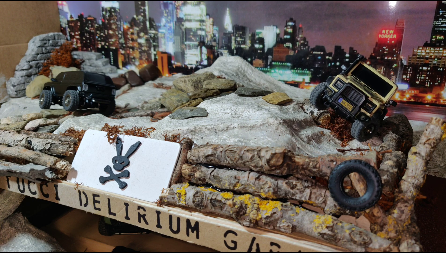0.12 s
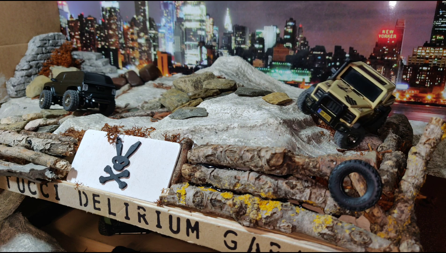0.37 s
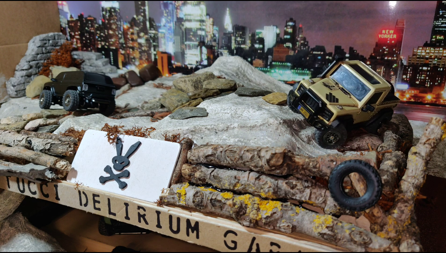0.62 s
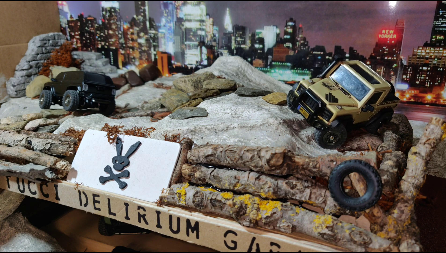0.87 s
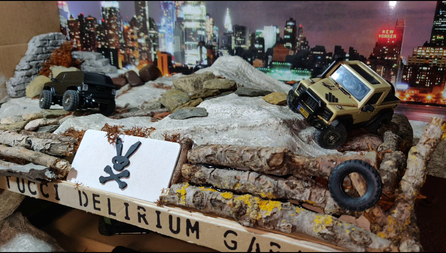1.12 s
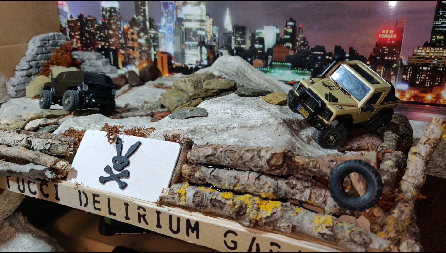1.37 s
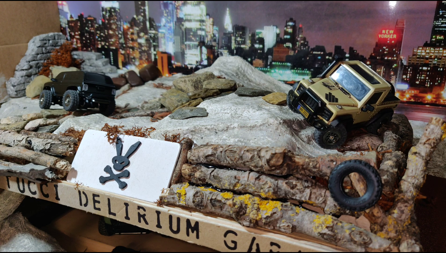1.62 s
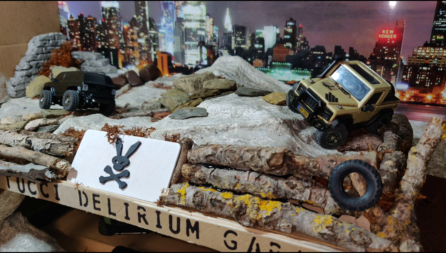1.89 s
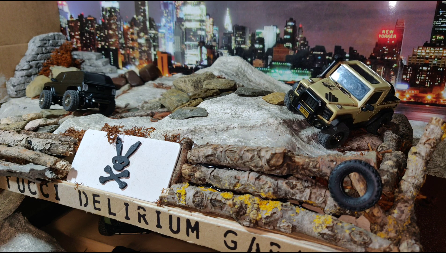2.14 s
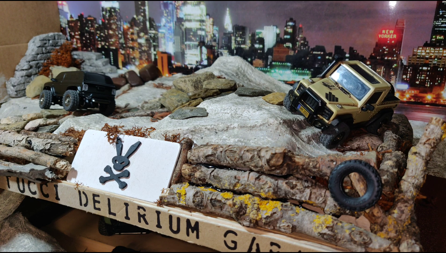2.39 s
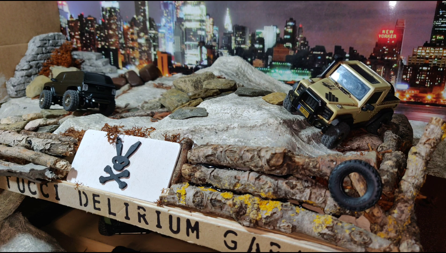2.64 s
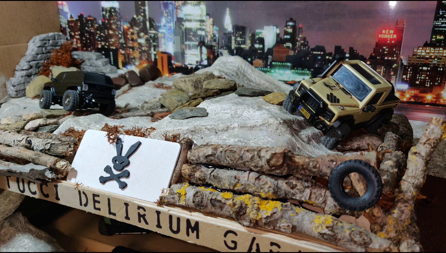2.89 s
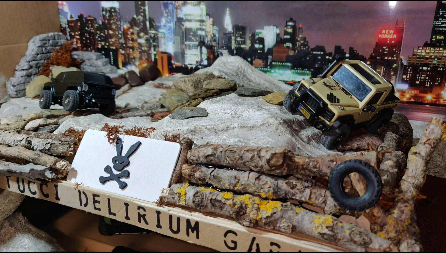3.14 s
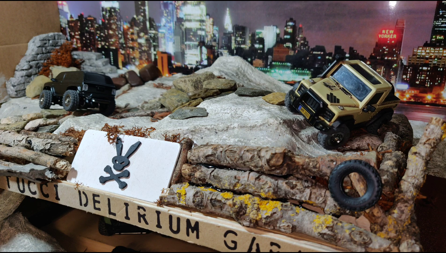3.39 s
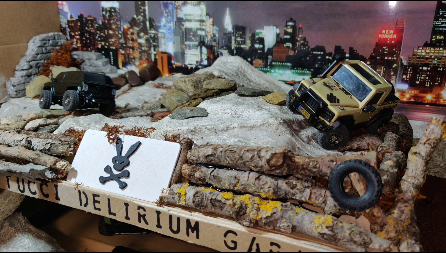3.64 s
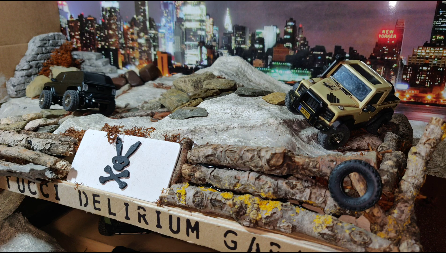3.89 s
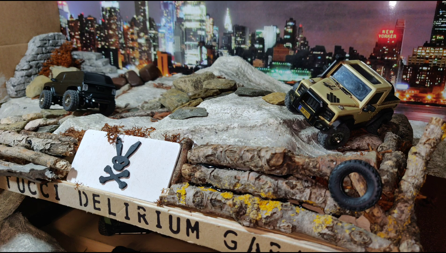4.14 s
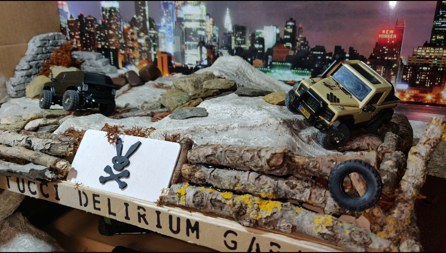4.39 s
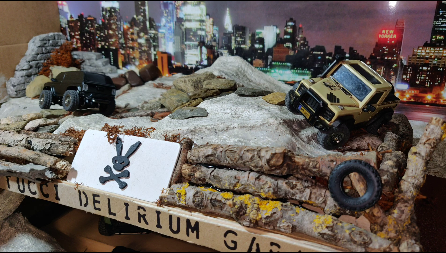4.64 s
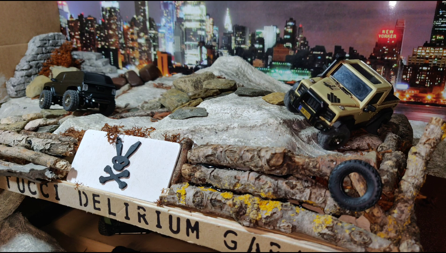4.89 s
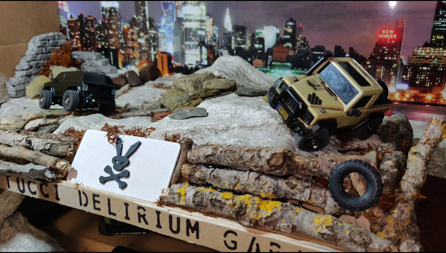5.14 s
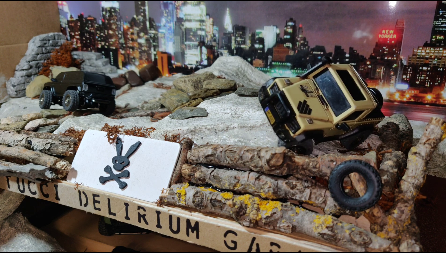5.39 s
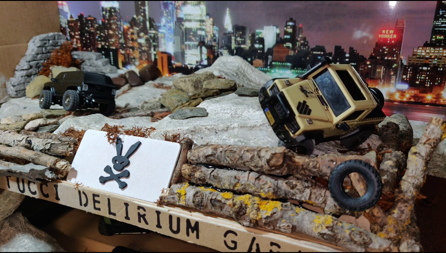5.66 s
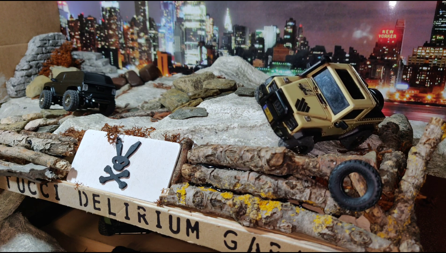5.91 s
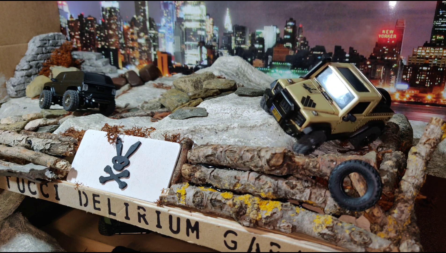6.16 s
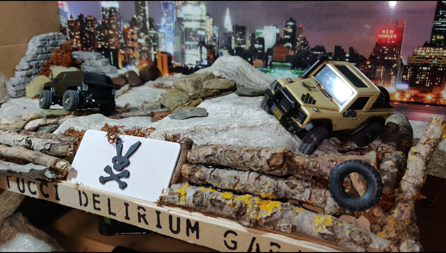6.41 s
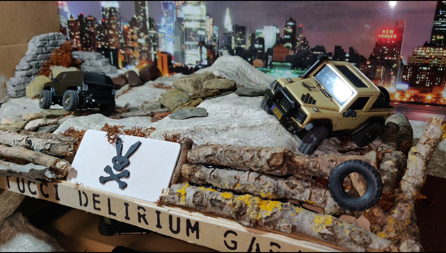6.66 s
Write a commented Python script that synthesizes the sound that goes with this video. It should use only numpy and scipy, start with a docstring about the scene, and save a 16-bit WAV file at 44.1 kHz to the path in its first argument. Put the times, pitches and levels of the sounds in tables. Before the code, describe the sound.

Close up in a quiet room, a tiny electric toy vehicle climbs rocks on a hollow board. A bright rattling gear whir rises and falls in under a second, then come sparse, tiny motor nudges and a few light knocks. Near five seconds a stronger, higher whir brings sharp plastic clacks and tyre scuffs, followed by small twitches and one last brief burst with clustered clicks. Faint hiss and low rumble remain underneath.

```python
"""Toy crawler on a hollow rock course

A tiny toy climbs rocks on a table-top board close to a phone with two unlike microphone ports. Meshing teeth
give a whine that glides with pinion speed and a noise rattle, both coloured by resonances of a plastic case.
Impulses ring the chassis and boom the board, shaped noise makes the tyre scuffs and a last soft breath-like
rustle, wavering sines make faint hums, and noise shaped over frequency makes the hush and rumble of a quiet
room."""
import sys
import numpy as np
from scipy import signal
from scipy.fft import rfft, irfft, next_fast_len
from scipy.io import wavfile
from scipy.ndimage import uniform_filter1d

SR = 44100
rng = np.random.default_rng(int(sys.argv[2]) if len(sys.argv) > 2 else 0)


def transcribe(signal):
    """Save signal, clipped to [-1, 1], as a 16-bit WAV file at the path in sys.argv[1]."""
    frames = np.atleast_2d(signal).T
    limited = np.clip(frames, -1, 1)
    pcm = np.round(limited * 32767).astype(np.int16)
    wavfile.write(sys.argv[1], SR, pcm)


def gain_from_db(level_db):
    """Turn a decibel level (scalar or array-like) into a linear amplitude factor."""
    decades = np.asarray(level_db, float) / 20
    return 10 ** decades


N = 298998  # length in samples

# Levels of sources are relative: the case, the echoes and the ports still alter them.
# Three climbs under full throttle: (time [s], tooth rate of the pinion [Hz], gear rattle level [dB])
CLIMBS = [
    [(.2, 595, -85), (.266, 802, -50), (.335, 1360, -39), (.382, 1953, -35), (.414, 1591, -36.5),
     (.463, 2284, -35), (.495, 2440, -32.5), (.515, 2348, -37.5), (.533, 2640, -34), (.553, 2620, -33),
     (.58, 2200, -34), (.605, 2053, -36), (.65, 2271, -33.5), (.687, 2126, -32), (.705, 2010, -31.5),
     (.72, 1814, -38), (.774, 1340, -34.5), (.815, 1000, -44), (.85, 698, -66), (.92, 510, -69)],
    [(4.8, 600, -96), (4.862, 1099, -47.5), (4.93, 1852, -35), (4.96, 1921, -30.5), (4.985, 1800, -35),
     (5.028, 2297, -30.5), (5.054, 2916, -27), (5.08, 3116, -29.5), (5.115, 3240, -28), (5.15, 3090, -32.5),
     (5.207, 2143, -33), (5.239, 1630, -36.5), (5.265, 1460, -34.5), (5.35, 1802, -38.5), (5.4, 2265, -40),
     (5.435, 2474, -34.5), (5.47, 2375, -34), (5.503, 1900, -33), (5.538, 1387, -47.5), (5.6, 700, -58)],
    [(6.01, 621, -73), (6.052, 1005, -47.5), (6.12, 2638, -42.5), (6.145, 3008, -39.5), (6.175, 2842, -25),
     (6.206, 2237, -29.5), (6.225, 2396, -32), (6.257, 2132, -31.5), (6.3, 2000, -32), (6.39, 1390, -34.5),
     (6.5, 603, -63)],
]
# Short nudges at creeping speed: (start of full level [s], hold [s], gear rattle level [dB])
NUDGES = [(1.244, 0.084, -44), (1.76, 0.014, -61.5), (1.955, .005, -55.5), (2.005, 0.01, -53.5),
          (2.2, 0.013, -59.5), (2.318, .001, -67), (2.42, 0.12, -49), (2.82, .05, -45.5), (2.89, .1, -40),
          (3.03, .03, -47.5), (3.19, 0.0022, -50.5), (3.256, .003, -54.5), (3.3, .005, -61.5),
          (3.346, 0.0033, -57.5), (3.52, 0.012, -59), (3.702, 0.021, -49), (3.932, 0.0025, -53.5),
          (4.052, .01, -46.5), (5.61, 0.068, -48), (5.7, 0.069, -52.5), (5.8, 0.0022, -49),
          (5.865, 0.08, -59.5)]
NUDGE_RISE_DB_S, NUDGE_FALL_DB_S = 550, 374
CREEP_HZ = 452.2  # mean tooth rate outside the climbs
TEETH, WHEEL_TEETH = 11, 37  # pinion, and the wheel it drives
# First five multiples of the tooth rate: (relative level [dB])
WHINE_ORDERS_DB = [-3, 4.5, 5, -5, -16]
# Whine over rattle in each climb, before its fades: (level [dB])
CLIMB_WHINE_DB = [-6, -9, -10]
# the whine stands out of the rattle once the pinion is fast
WHINE_FULL_HZ, WHINE_DB_PER_KHZ, WHINE_DRIFT_DB = 1800, 29, 1.5
# under a light load it fades, as the climb's rattle drops below this level
WHINE_LOADED_DB, WHINE_DB_PER_DB = -40, 4
RADIATES_HZ = 2300
TOOTH_PUFF = 0.3  # depth of the rattle's puff at each tooth
OWN_RATTLE = 0.66  # power share of the rattle that each port hears from another face of the case
# Resonances of the gear case: (frequency [Hz], width [Hz], gain [dB])
CASE_MODES = [(2090, 170, 2.5), (2570, 340, 4), (4767, 243, 9.5), (6730, 270, 7), (7450, 140, 6),
              (9320, 470, 5)]
CAN_HZ, CAN_WIDTH_HZ = 5870, 190
HOLLOW_HZ, HOLLOW_WIDTH_HZ, HOLLOW_DB = 3450, 1100, -8
# Gains as the toy tilts: (time [s], motor can's note [dB], top treble [dB])
FACING = [(0.2, 12.5, -6), (.6, 17.5, 11), (1.3, 16.5, -22), (3.001, 16.5, 4), (5, 16, 5), (5.5, 18.5, 7),
          (6.1, 11.5, 1.5), (6.252, 6.5, 11), (6.5, 9, 9)]

# Chassis on rock and bark: (time [s], knock peak [dB], boom of the board [dB], sharp tick [dB])
KNOCKS = [(0.327, -37, -49, -46.5), (0.624, -70, -45, -56), (0.656, -46, -51, -48),
          (0.679, -40, -40.5, -42), (0.836, -50.5, -56, -51), (2.465, -49, -59.5, -70),
          (2.881, -44.5, -52, -47), (3.005, -41.5, -48, -55), (3.7, -58, -79, -72), (4.05, -55.5, -81, -61),
          (4.869, -51.5, -50, -48), (4.922, -33.5, -46.5, -68), (4.984, -46, -44, -56),
          (5.03, -35, -49, -54), (5.052, -30.5, -49, -59), (5.074, -38, -42, -63),
          (5.366, -19.5, -38.5, -40), (5.422, -29.5, -37, -54), (5.483, -39.5, -52, -60),
          (5.691, -43, -52.5, -62), (6.172, -62, -62, -65), (6.204, -31.5, -41.5, -51),
          (6.234, -42, -53, -36), (6.254, -35, -73, -51), (6.28, -36.5, -38, -45), (6.309, -38, -41, -47),
          (6.354, -35.5, -59, -38)]
SCATTER_DB = 2  # spread of each mode's level from knock to knock
# Modes of the chassis: (frequency [Hz], relative level [dB], decay by 60 dB [s])
CHASSIS_MODES = [(408, -16, 0.19), (787, 7, 0.012), (1016, 5, 0.007), (1423, 5.5, 0.011),
                 (1900, -8, 0.0047)]
# Modes of the hollow board: (frequency [Hz], relative level [dB], decay by 60 dB [s])
BOARD_MODES = [(60.84, -2.5, 0.79), (78.5, -5, 0.46), (100.3, 4, 0.38), (156, -5, 0.26), (310, 2.5, 0.042)]
# Weight shifting on the board keeps it humming: (start of full level [s], hold [s], level [dB])
STIRS = [(.68, .08, -60), (1.34, 0.023, -63), (4.85, 0.094, -76), (5.03, 0.14, -59), (6.38, 0.067, -55)]
STIR_REST_DB, STIR_RISE_DB_S, STIR_FALL_DB_S = -71.5, 73, 29

# Tyres and belly drag on the rocks; the last swell is a soft breath-like rustle: (start of full level [s], hold
# [s], level [dB])
SCUFFS = [(.356, 0.0084, -51.5), (.63, 0.08, -53), (1.79, .08, -70.5), (2.2, 0.045, -69), (2.318, .01, -65),
          (2.9, .12, -60.5), (4.84, 0.059, -65), (4.96, 0.0078, -53), (5.0, 0.077, -48.5),
          (5.38, 0.053, -45.5), (5.49, 0.021, -55), (5.8, 0.0056, -60.5), (5.87, 0.1, -61.5),
          (6.204, 0.0061, -42.5), (6.25, 0.061, -52), (6.36, .03, -55), (6.56, 0.12, -58.5)]
SCUFF_RISE_DB_S, SCUFF_FALL_DB_S = 341, 261
# Spectrum of a scuff: (frequency [Hz], relative level [dB])
SCUFF_COLOUR = [(80, -1.5), (250, 9), (400, 11.5), (1000, 0.5), (2500, -15.5), (5000, -31.5)]

# Faint wavering hums: (start of full level [s], hold [s], level [dB], mean pitch [Hz])
HUMS = [(1.783, 0.061, -66, 395), (2.194, 0.1, -72, 405), (4.55, 0.13, -59, 169), (4.846, 0.072, -59, 290),
        (6.553, 0.17, -61, 315), (6.563, 0.05, -69, 400), (6.59, 0.13, -77, 1860)]
HUM_RISE_DB_S, HUM_FALL_DB_S = 300, 150
HUM_WAVER = 0.06  # spread of pitch, as a share

# Room hush: (frequency [Hz], left density [dB/Hz], right density [dB/Hz], likeness of the ports [0-1]);
# below RUMBLE_HZ the densities give only the shape
HUSH = [(19, -75, -79, 1), (41, -59.5, -67, 0.8), (72.4, -84, -72.5, 1), (103.4, -77.5, -86, 0.84),
        (148, -89.5, -94, 0.19), (230, -94.5, -95.5, 0.13), (500, -96.5, -99, 0), (1040, -101, -102, 0),
        (2000, -104, -105, 0), (4000, -104, -104, 0), (5400, -100, -104, 0), (7560, -109, -104, 0),
        (9550, -114, -113, 0.06), (15500, -114, -113, 0.26)]
# Lowest hush: (time [s], rms level over both ports before its drift [dB])
RUMBLE = [(0, -53.5), (.2, -49.5), (1.6, -54.5), (2.4, -55), (2.9, -59.5), (4.2, -58.5), (5.5, -55.5),
          (6.78, -57.5)]
RUMBLE_HZ, RUMBLE_DRIFT_DB = 81.5, 0.5

# Response of each port towards the toy: (frequency [Hz], left gain [dB], right gain [dB])
PORTS = [(30.2, -7, -11), (1026, -2, -4.5), (3240, 11.5, 10.5), (3880, 16.5, -3.5), (4230, 18, 10.5),
         (4460, 14.5, 8.5), (6000, 17.5, -5), (6680, 18, 8), (7420, 10.5, 20), (8500, 6, 19.5),
         (8930, -18, 12.5), (10100, -24, -1.5), (13700, -6.5, 0.5), (15600, -21, -5)]
ECHO_T60_S, ECHO_DB = 0.05, -2  # close echoes; energy against the straight sound


def unit(x):
    """Normalisation to rms 1."""
    return x / np.sqrt(np.mean(x ** 2))


def walk(rate):
    """Low-passed noise: smooth chance that changes about rate times a second, spread 1."""
    k = max(int(SR / rate), 1)
    return unit(uniform_filter1d(uniform_filter1d(rng.standard_normal(N), k), k))


def play(tables, column, rest):
    """Piecewise-linear control: one column of a list of bursts over time, rest between them."""
    t = np.arange(N) / SR
    out = np.full(N, float(rest))
    for rows in map(np.array, tables):
        on = (t >= rows[0, 0]) & (t <= rows[-1, 0])
        out[on] = np.interp(t[on], rows[:, 0], rows[:, column])
    return uniform_filter1d(out, size=350)


def swells(rows, rise, fall):
    """Exponential envelopes: gain that rises and falls at set dB per second around a held level."""
    t = np.arange(N) / SR
    power = 0
    for s, hold, db in rows:
        before, after = np.clip(s - t, 0, None), np.clip(t - s - hold, 0, None)
        power = power + gain_from_db(db - rise * before - fall * after) ** 2
    return np.sqrt(power)


def over_hz(hz, value, size):
    """Interpolation on a log-frequency axis for an rfft of that size."""
    return np.interp(np.log(np.fft.rfftfreq(size, 1 / SR) + 1), np.log(hz), value)


def colour(x, hz, db):
    """Minimum-phase filter of that gain: the cepstrum of its log is folded to be causal."""
    cep = irfft(over_hz(hz, db, size=2048) * np.log(10) / 20)
    cep[1:1024] *= 2
    cep[1025:] = 0
    return signal.fftconvolve(x, irfft(np.exp(rfft(cep))))[:N]


def ring(x, hz, t60):
    """Damped mode: a unit impulse gives a decaying sine of peak about 1."""
    r = np.exp(-np.log(1000) / (t60 * SR))
    w = 2 * np.pi * hz / SR
    return signal.lfilter([0, np.sin(w)], [1, -2 * r * np.cos(w), r * r], x)


def resonance(x, hz, width):
    """Band-pass response of one resonance, gain 1 at its peak."""
    return signal.lfilter(*signal.iirpeak(hz, hz / width, SR), x)


def highpass(x, order, hz):
    """Butterworth high-pass filter."""
    return signal.sosfilt(signal.butter(order, hz, "high", fs=SR, output="sos"), x)


def gear_whine(turn):
    """Harmonic excitation: multiples of the tooth rate, each wavering in level."""
    whine = 0
    for k, db in enumerate(WHINE_ORDERS_DB, start=1):
        whine = whine + gain_from_db(db + 2.5 * walk(110)) * np.sin(k * turn)
    # so small a case sends out little of a low whine
    return unit(highpass(whine, 3, RADIATES_HZ))


def gear_rattle(turn):
    """Amplitude-modulated noise: a rattle that puffs at each tooth, partly shared by the two ports."""
    both, *own = rng.standard_normal((3, N))
    noise = np.sqrt(1 - OWN_RATTLE) * both + np.sqrt(OWN_RATTLE) * np.array(own)
    return unit(noise * (1 + TOOTH_PUFF * np.cos(turn)) * gain_from_db(1.3 * walk(260)))


def gear_case(drive):
    """Resonant radiation: case and motor can favour their own modes, and the top treble follows the tilt."""
    s, *gains_db = np.transpose(FACING)
    ring_db, top_db = (np.interp(np.arange(N) / SR, s, db) for db in gains_db)
    case = drive + (gain_from_db(top_db) - 1) * highpass(drive, 2, 9000)
    # the motor can rings on one note
    case = case + (gain_from_db(ring_db) - 1) * resonance(drive, CAN_HZ, CAN_WIDTH_HZ)
    for hz, width, db in CASE_MODES:
        case = case + (gain_from_db(db) - 1) * resonance(drive, hz, width)
    # the walls cancel each other in one band
    return case + (gain_from_db(HOLLOW_DB) - 1) * resonance(case, HOLLOW_HZ, HOLLOW_WIDTH_HZ)


def gearbox():
    """Gear meshing: teeth meet at the tooth rate and drive the case with whine and rattle."""
    hz = uniform_filter1d(play(CLIMBS, column=1, rest=CREEP_HZ), size=700)
    climb_db = play(CLIMBS, column=2, rest=-100)
    climb = np.searchsorted([rows[-1][0] for rows in CLIMBS[:-1]], np.arange(N) / SR)
    whine_db = np.array(CLIMB_WHINE_DB)[climb] + WHINE_DRIFT_DB * walk(22.73)
    whine_db = whine_db - WHINE_DB_PER_KHZ * np.clip(WHINE_FULL_HZ - hz, 0, None) / 1000
    whine_db = whine_db - WHINE_DB_PER_DB * np.clip(WHINE_LOADED_DB - climb_db, 0, None)
    turn = 2 * np.pi * np.cumsum(hz * (1 + 0.01 * walk(300))) / SR  # tooth phase [rad]
    # the pinion runs off centre, so every shaft turn swells once; the driven wheel adds a slower swing
    wobble = (1 + 0.5 * np.sin(turn / TEETH)) * (1 + 0.3 * np.sin(turn / WHEEL_TEETH))
    drive = gear_rattle(turn) * np.sqrt(wobble) + wobble * gear_whine(turn) * gain_from_db(whine_db)
    throttle = np.hypot(gain_from_db(climb_db), swells(NUDGES, NUDGE_RISE_DB_S, NUDGE_FALL_DB_S))
    return gain_from_db(-18.5) * gear_case(drive) * throttle


def knocks():
    """Impact excitation: a short burst of contact strikes chassis modes unevenly and shakes the board softly."""
    out, tail = np.zeros(N), np.arange(600)
    chance = rng.standard_normal((len(KNOCKS), len(tail) + len(CHASSIS_MODES)))
    grain, scatter = chance[:, :len(tail)], SCATTER_DB * chance[:, len(tail):]
    s, peak_db, boom_db, tick_db = np.transpose(KNOCKS)
    at = ((s + 0.00099) * SR).astype(int)  # the blow peaks a moment after first touch
    contact = 0.07 * np.exp(-tail / (0.004 * SR)) * grain
    contact[:, 0] = 1
    for k, (hz, db, t60) in enumerate(CHASSIS_MODES):
        blows = np.zeros(N)
        for i, row, gain in zip(at, contact, gain_from_db(peak_db + db - 7.0 + scatter[:, k])):
            blows[i:i + len(tail)] += gain * row
        # plastic on stone gives way for a fraction of a millisecond
        out += ring(uniform_filter1d(blows, size=9), hz, t60)
    # a hard edge on stone gives a wide click of a few milliseconds
    click = np.exp(-tail / (0.0025 * SR))
    for i, row, gain in zip(at, grain, gain_from_db(tick_db)):
        out[i:i + len(tail)] += gain * click * row
    push = np.zeros(N)
    push[at] = gain_from_db(boom_db)
    soft = signal.windows.hann(250)
    push = signal.fftconvolve(push, soft / soft.sum())[:N]
    return out + gain_from_db(5.0) * board(push)


def tyres_and_rustle():
    """Friction noise: rubber lugs scuff over stone in uneven grains; the last swell is a soft breath-like
    rustle."""
    grains = rng.standard_normal(N) * gain_from_db(2.0 * walk(117))
    return unit(colour(grains, *np.transpose(SCUFF_COLOUR))) * swells(SCUFFS, SCUFF_RISE_DB_S, SCUFF_FALL_DB_S)


def board(push):
    """Modal superposition: the hollow board under the rocks answers a push with all its modes."""
    return sum(gain_from_db(db) * ring(push, hz, t60) for hz, db, t60 in BOARD_MODES)


def stir():
    """Random excitation: a soft uneven push on the board as the load moves."""
    # too brief to move the deepest modes
    push = highpass(rng.standard_normal(N), 2, 140)
    return unit(board(push)) * np.hypot(gain_from_db(STIR_REST_DB), swells(STIRS, STIR_RISE_DB_S, STIR_FALL_DB_S))


def hum():
    """Frequency modulation: soft sines, unsteady in pitch and level."""
    turn = 2 * np.pi * np.cumsum(1 + HUM_WAVER * walk(30.3)) / SR  # phase of a tone of mean 1 Hz
    out = np.zeros(N)
    for *row, hz in HUMS:
        tone = np.sqrt(2) * np.sin(hz * turn) * gain_from_db(0.83 * walk(40))
        out += tone * swells([row], HUM_RISE_DB_S, HUM_FALL_DB_S)
    return out


def hush():
    """Partly coherent noise: room air and microphone hiss, with bass alike at both ports that swells slowly."""
    hz, left_db, right_db, like = np.transpose(HUSH)
    size = next_fast_len(N)
    like = np.clip(over_hz(hz, like, size), 0, 1)
    both, left, right = rfft(rng.standard_normal((3, size)))
    out = []
    for own, db in ((left, left_db), (right, right_db)):
        mixed = np.sqrt(like) * both + np.sqrt(1 - like) * own
        out.append(irfft(mixed * gain_from_db(over_hz(hz, db, size)), size)[:N])
    out = np.array(out) * np.sqrt(SR / 2)
    low = signal.sosfiltfilt(signal.butter(4, RUMBLE_HZ, fs=SR, output="sos"), out)
    s, db = np.transpose(RUMBLE)
    rumble_db = np.interp(np.arange(N) / SR, s, db) + RUMBLE_DRIFT_DB * walk(10.5)
    return out - low + low / np.std(low) * gain_from_db(rumble_db)


def scene():
    """Superposition of paths: the toy reaches each port straight and by close echoes off rocks and backdrop."""
    toy = gearbox() + tyres_and_rustle() + knocks() + stir() + hum()
    t = np.arange(int(0.15 * SR)) / SR
    hz, *port_db = np.transpose(PORTS)
    heard = []
    # the straight sound comes five samples later at the left port
    for lag, sound, db in zip((5, 0), toy, port_db):
        echo = rng.standard_normal(len(t)) * np.exp(-np.log(1000) * t / ECHO_T60_S) * (t > 0.0008)
        # long waves bend round the rocks and leave little echo pattern
        echo = highpass(echo, 1, 900)
        path = gain_from_db(ECHO_DB) * echo / np.sqrt(np.sum(echo ** 2))
        path[lag] += 1
        heard.append(colour(signal.fftconvolve(sound, path)[:N], hz, db))
    return np.array(heard) + hush()


def top_cut(x):
    """Nothing passes above the cut-off."""
    return signal.sosfilt(signal.butter(12, 15860, fs=SR, output="sos"), x)


def record(dry):
    """Output stage: the finished mix as the phone delivers it."""
    return top_cut(dry)


dry = scene()
out = record(dry)
transcribe(out)
```